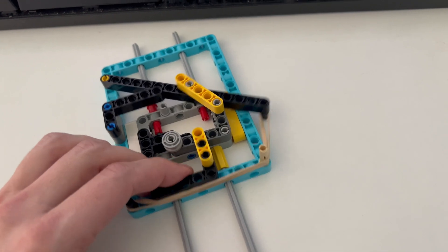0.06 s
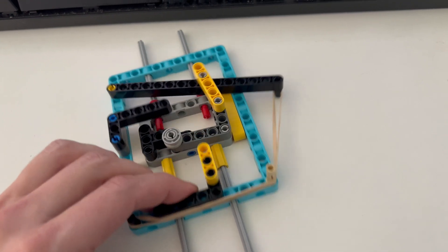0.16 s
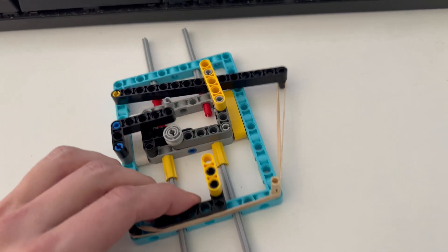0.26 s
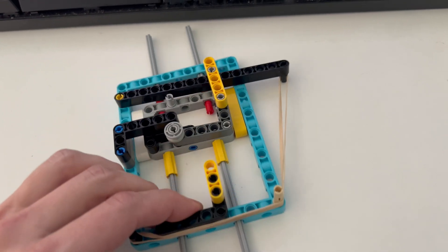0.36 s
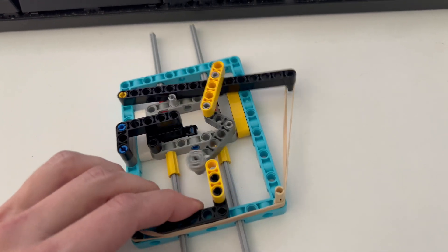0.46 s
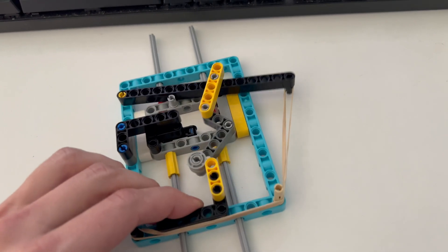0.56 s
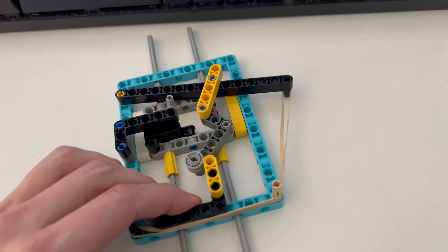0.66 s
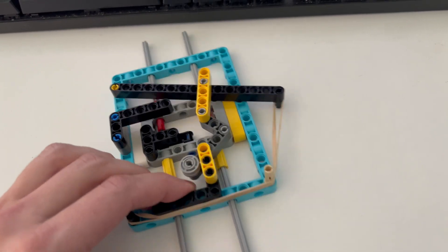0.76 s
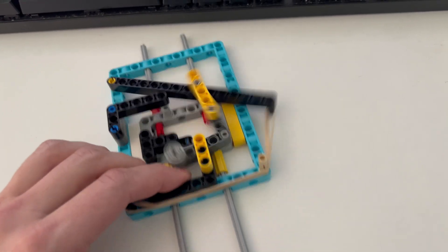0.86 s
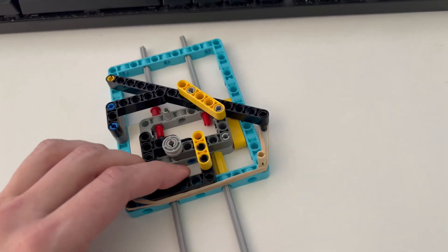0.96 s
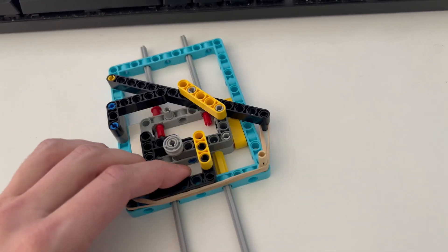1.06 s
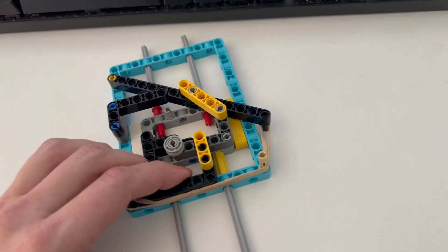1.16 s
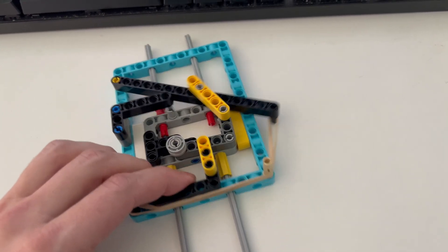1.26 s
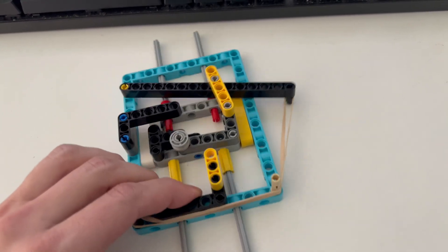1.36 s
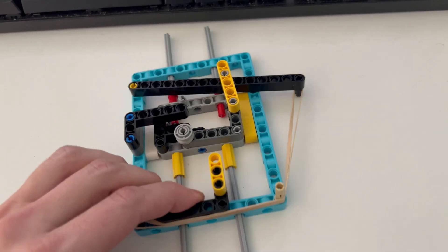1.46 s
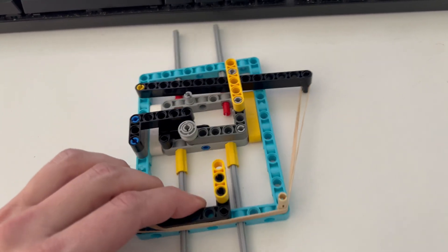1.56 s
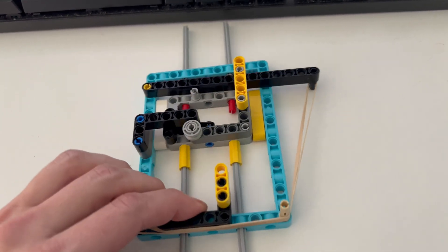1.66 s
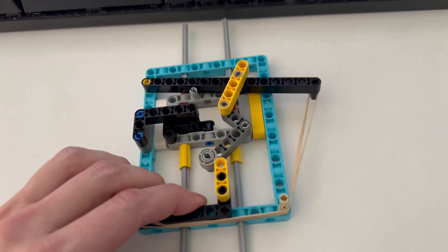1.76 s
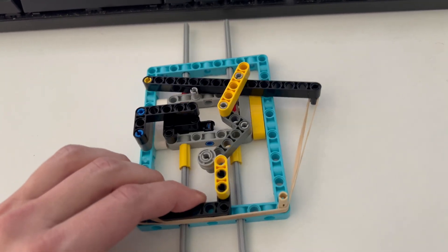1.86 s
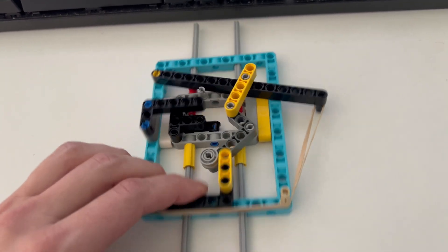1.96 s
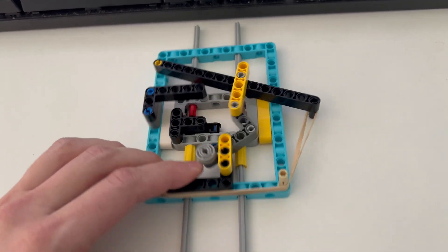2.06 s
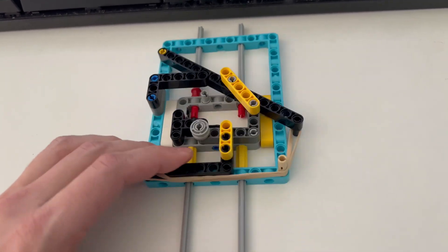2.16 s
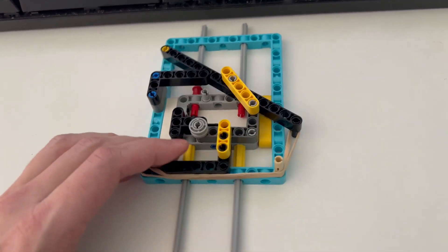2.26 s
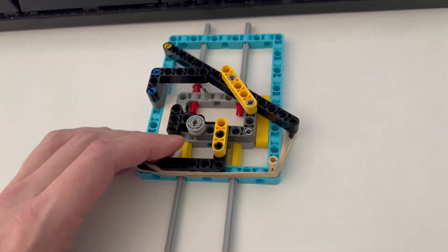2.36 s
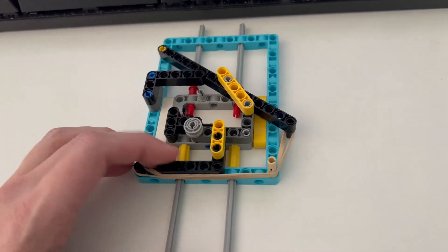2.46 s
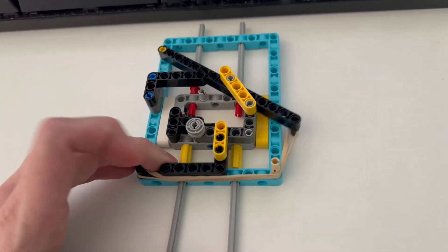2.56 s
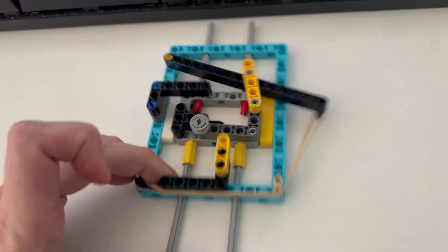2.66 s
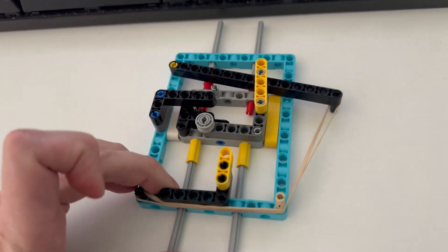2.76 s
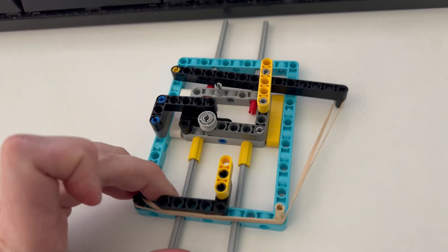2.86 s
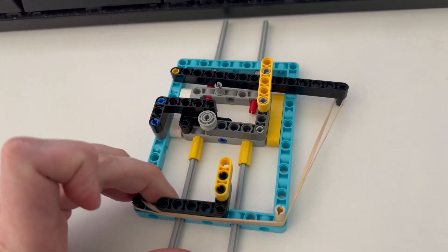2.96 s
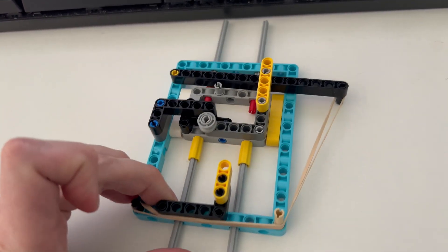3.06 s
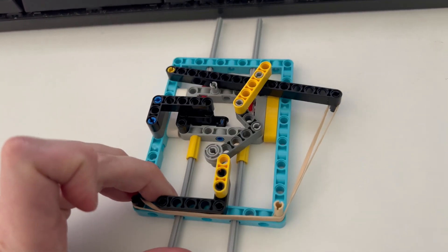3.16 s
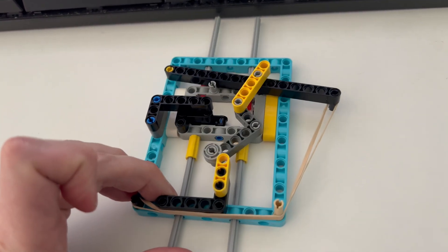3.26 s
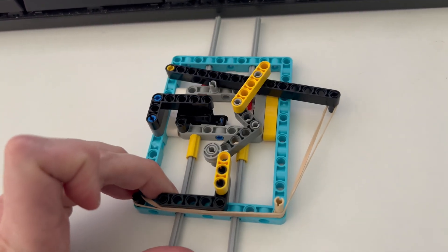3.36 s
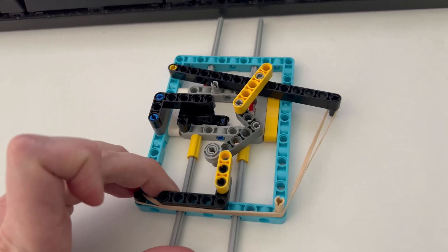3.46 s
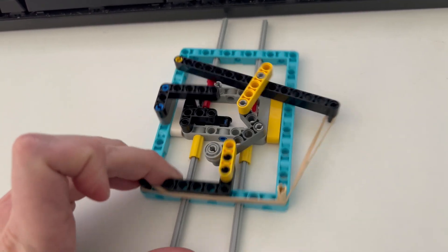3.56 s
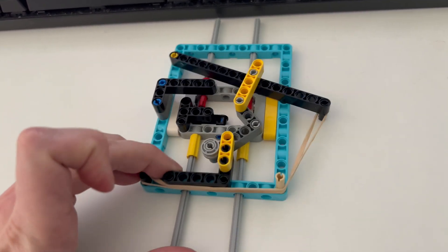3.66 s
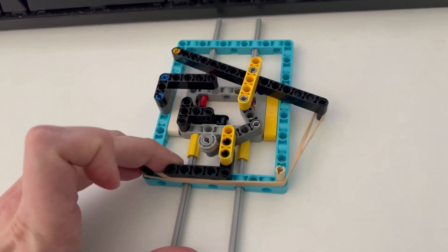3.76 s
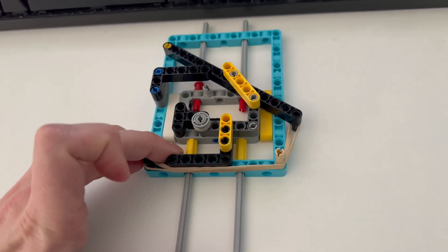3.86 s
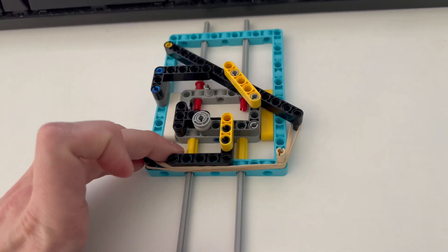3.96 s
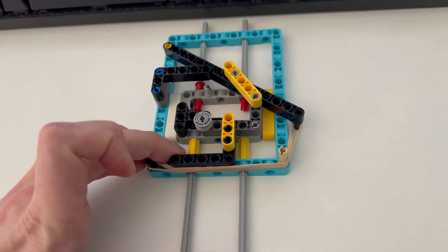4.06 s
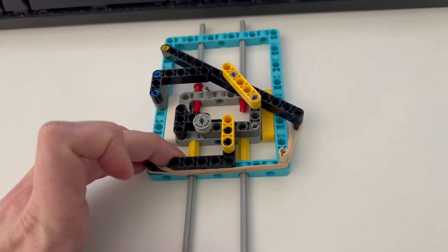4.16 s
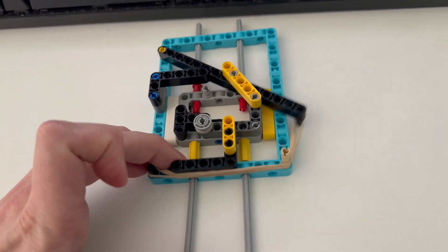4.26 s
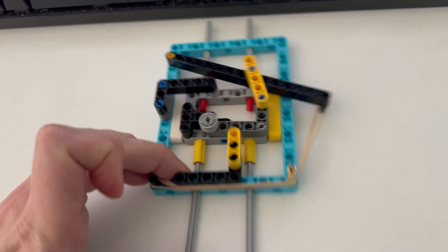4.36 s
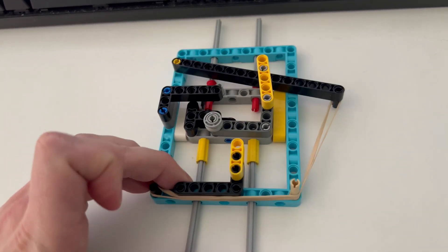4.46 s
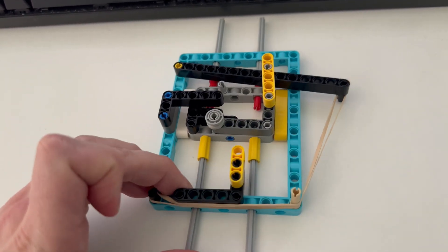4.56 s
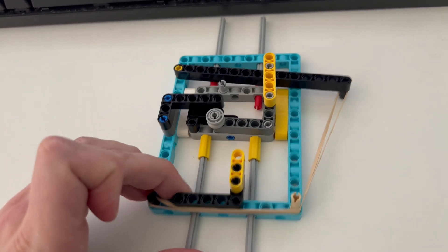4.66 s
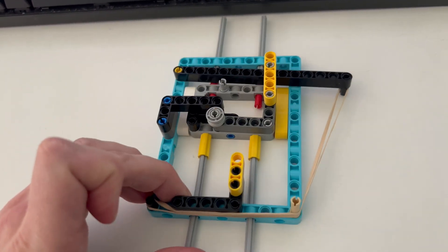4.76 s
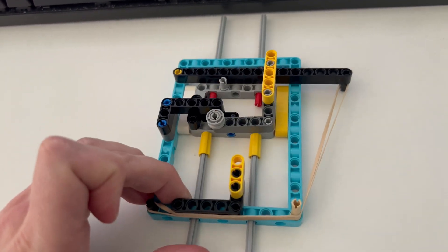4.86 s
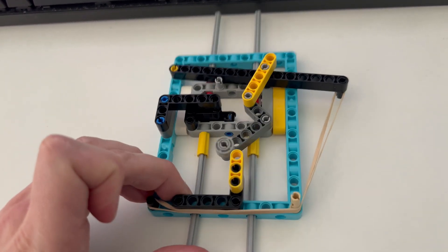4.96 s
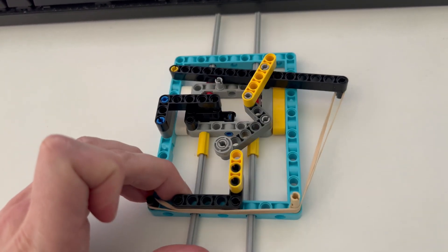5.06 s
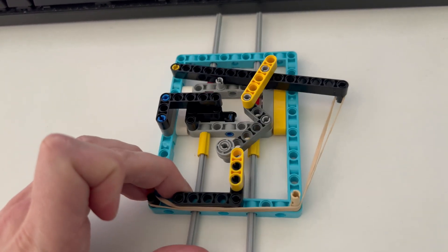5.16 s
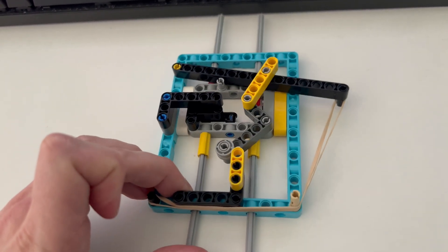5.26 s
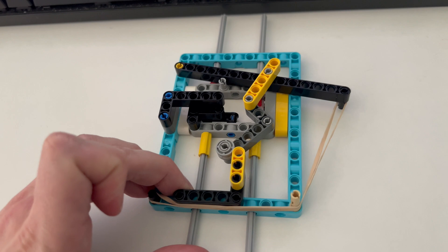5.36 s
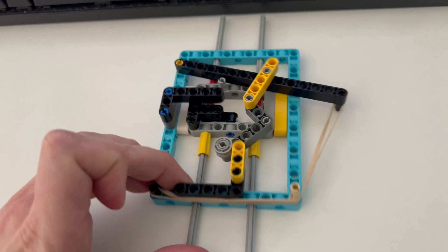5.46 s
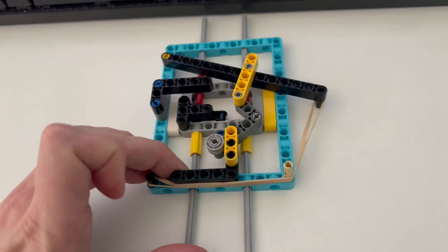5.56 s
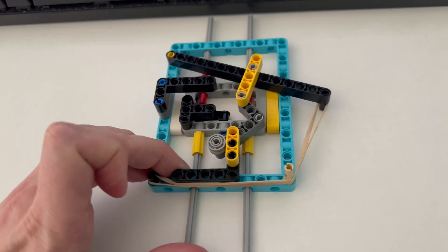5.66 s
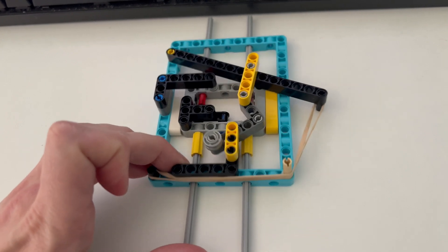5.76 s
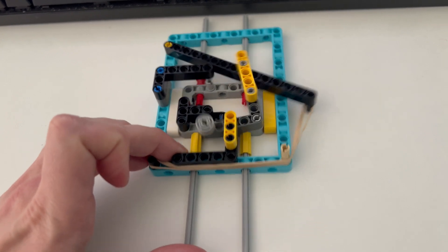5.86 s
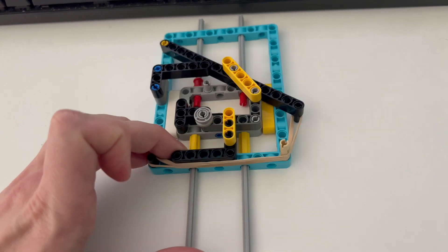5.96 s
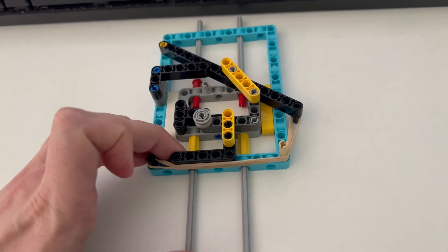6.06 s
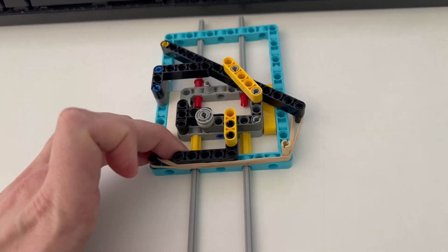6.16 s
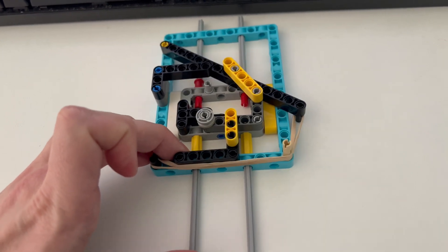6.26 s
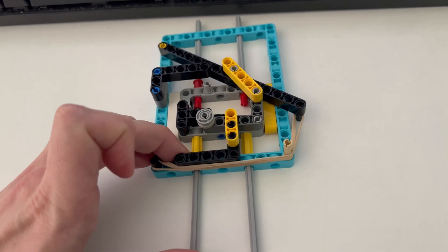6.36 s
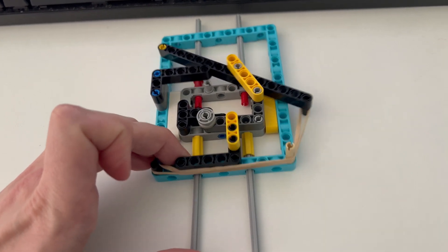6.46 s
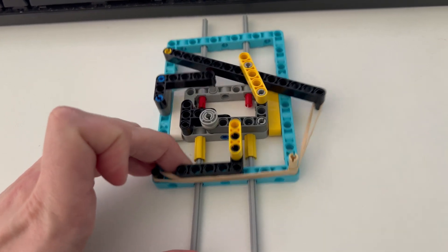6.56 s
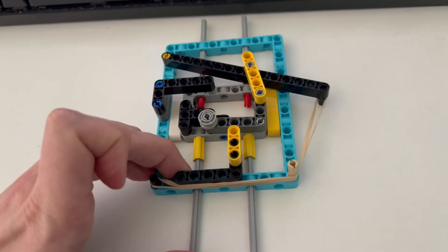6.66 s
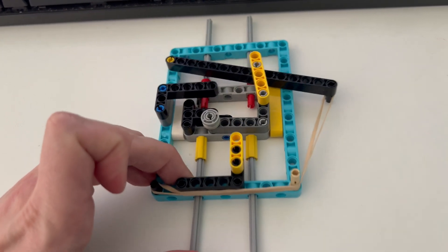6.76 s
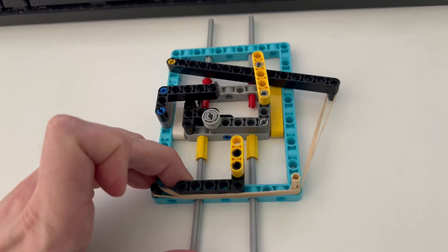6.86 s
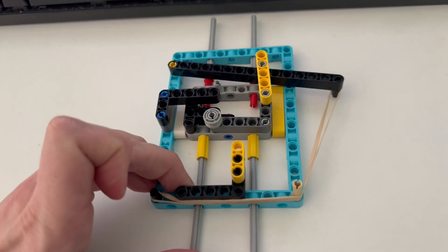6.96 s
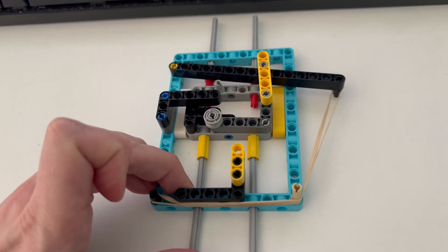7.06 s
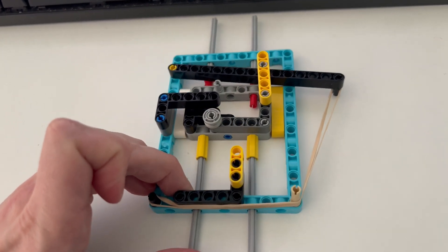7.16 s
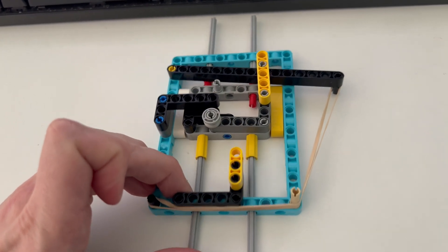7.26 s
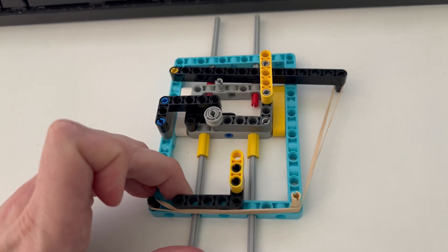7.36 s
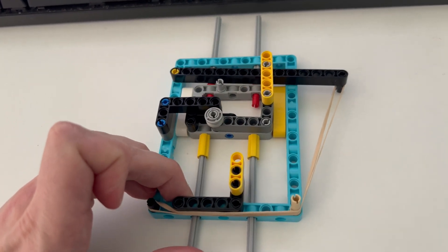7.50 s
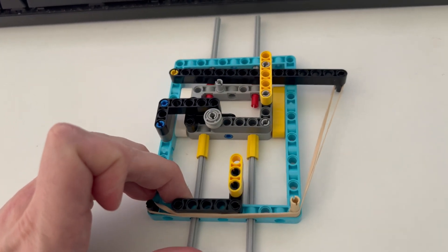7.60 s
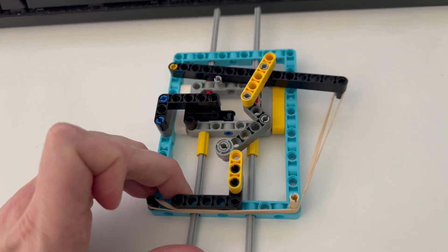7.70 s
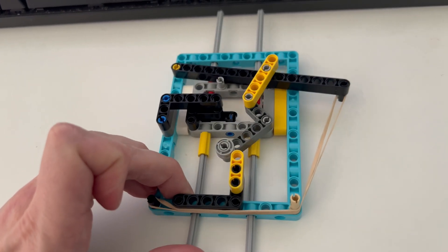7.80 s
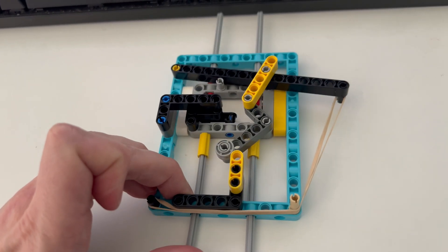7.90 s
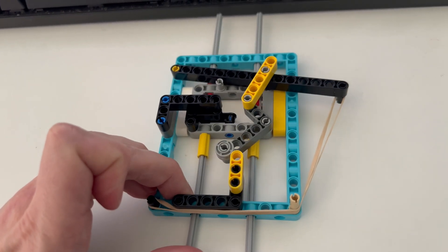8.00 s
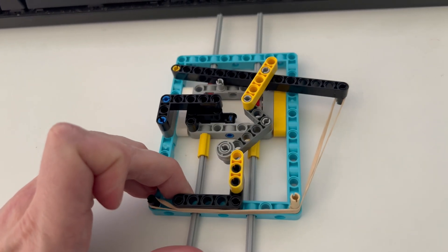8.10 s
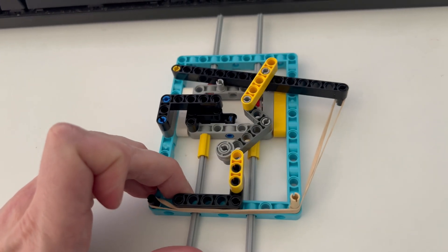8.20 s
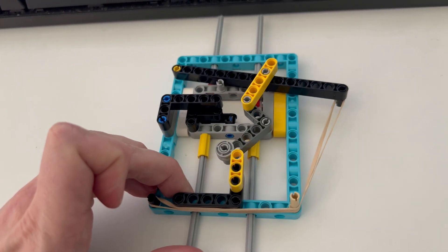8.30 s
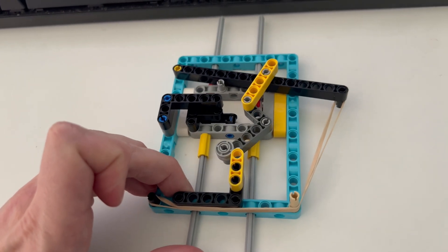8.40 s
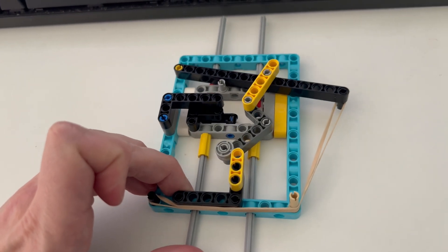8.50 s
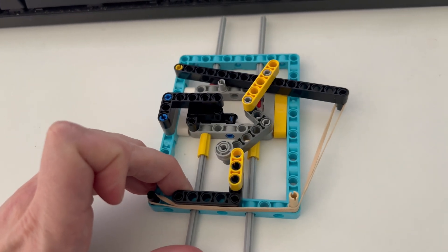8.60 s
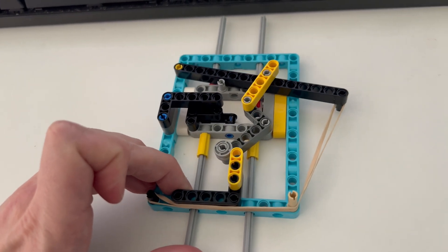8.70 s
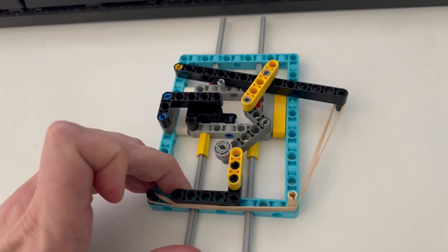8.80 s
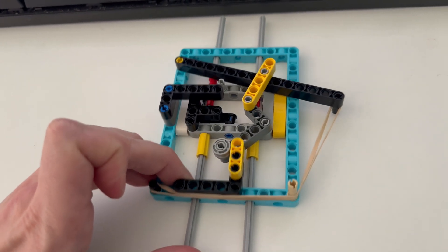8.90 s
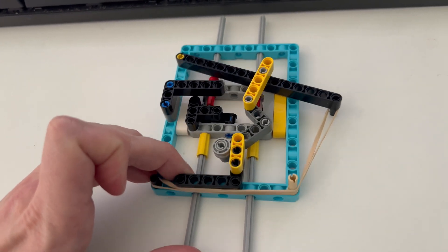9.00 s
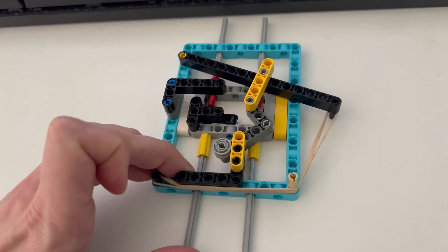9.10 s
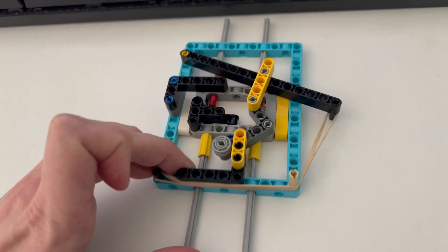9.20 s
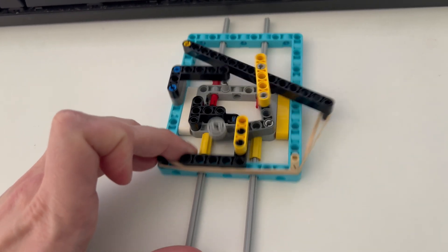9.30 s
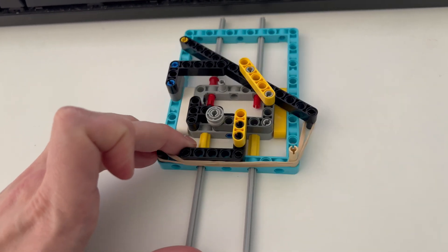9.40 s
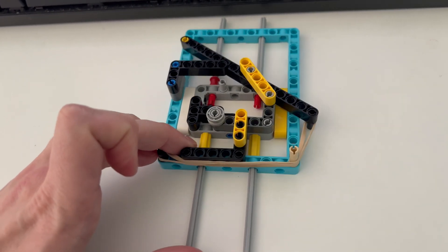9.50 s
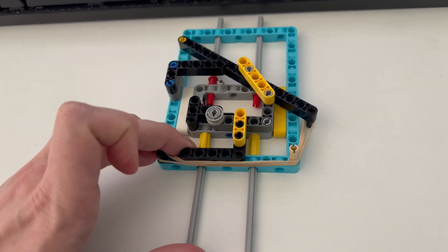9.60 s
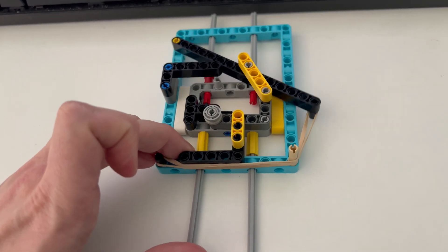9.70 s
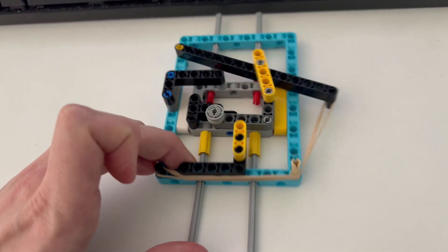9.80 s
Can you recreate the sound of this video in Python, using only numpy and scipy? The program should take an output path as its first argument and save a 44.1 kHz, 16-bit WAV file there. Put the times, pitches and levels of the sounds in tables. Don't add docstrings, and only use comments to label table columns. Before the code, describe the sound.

Close, dry and crisp: plastic parts rub along rods with gritty, faintly humming friction, speeding up before band-driven levers crack against their stops. Ten sharp snaps fall irregularly over ten seconds, most with a short loose rattle and a dull knock through the desk. Faint ticks, taps and grazes fill the gaps. Quiet low air noise lies beneath, with short small-room reflections.

```python
import sys
import numpy as np
from scipy import signal
from scipy.fft import rfft, irfft, next_fast_len
from scipy.io import wavfile
from scipy.ndimage import uniform_filter1d

SR = 44100
rng = np.random.default_rng(int(sys.argv[2]) if len(sys.argv) > 2 else 0)


def unload_audio(sound):
    columns = np.transpose(np.atleast_2d(sound))
    steps = np.round(np.clip(columns, -1, 1) * 32767)
    wavfile.write(sys.argv[1], SR, steps.astype(np.int16))


def invert_db(level):
    return 10 ** (np.asarray(level, dtype=float) / 20)


N = 433944
SIZE, LEAD = 4096, 512

# (frequency [Hz], level [dB per Hz])
AIR = [(25, -29.5), (36, -12.5), (52, -1.5), (108, -2.5), (160, -13), (250, -11.5), (330, -17.5),
       (600, -37), (1000, -35), (1650, -38), (3000, -50.5), (8000, -56), (16000, -50.5)]
# (time [s], level [dB])
DRAUGHT = [
    (0.0, -58),
    (0.52, -56),
    (1.23, -59),
    (2.05, -53.5),
    (2.38, -57.5),
    (4.27, -57.5),
    (4.96, -56),
    (6.93, -59),
    (8.06, -57),
    (9.84, -58),
]
# (frequency [Hz], decay time t60 [s])
ROOM = [(150, 1), (500, 0.97), (1500, 0.58), (4000, 0.43), (6500, 0.3), (10000, 0.1), (15000, 0.1)]
# (frequency [Hz], left minus right [dB])
PORT_BALANCE = [(60, 0), (400, 0), (700, -5), (1300, -1), (4400, -1), (8000, 0), (16000, 0)]
# (frequency [Hz], difference over sum [dB])
WIDTH = [(25, -24), (60, -21), (125, -12), (500, -1), (1200, 2), (1900, -3), (3300, 1), (4300, -2),
         (5000, 3), (6000, -7), (9500, -3), (12000, 7), (12900, 27), (14600, 27), (15600, 12)]

# (frequency [Hz], level [dB], decay time t60 [s])
BEAMS = [(1283, 0.5, 0.016), (1600, -8.5, 0.063), (2070, -8.5, 0.011), (2150, -15, 0.008), (2750, 0, 0.046),
         (3300, 4.5, 0.013), (3973, 1.5, 0.018), (4730, -10.5, 0.015), (6470, -1.5, 0.027),
         (7070, 7, 0.005), (8150, -7, 0.046), (12000, -27, .015)]
# (frequency [Hz], level [dB], decay time t60 [s])
FRAME = [(406, -9.5, 0.033), (440.5, 1, 0.062), (490, -12.5, 0.047), (713.4, 0, 0.069),
         (826.3, -0.5, 0.073), (910, -6.5, 0.033)]
# (frequency [Hz], level [dB], decay time t60 [s])
DESK = [(75, 1.5, 0.14), (111, -7, 0.2), (192, -14.5, 0.13), (285, 1.5, 0.071)]
# (frequency [Hz], level [dB], decay time t60 [s])
STRUCK = [
    [(1670, -5.5, 0.026), (3680, -3, 0.042), (4270, -1, 0.03), (8100, -7, 0.029)],
    [(2740, -4.5, 0.039), (4447, -25, 0.52), (5930, -3, 0.028), (7860, -1.5, 0.03)],
    [(1730, -20, 0.13), (4597, -8, 0.013), (6248, -9.5, 0.014), (7600, -13, 0.057)],
    [(2605, -7.5, 0.034), (3420, -17, 0.043), (4960, 1.5, 0.018), (7870, 0, 0.017)],
    [(2650, -10, 0.048), (4900, -9, 0.026), (6390, -10.5, 0.031), (7860, -2.5, 0.012)],
    [(1620, -16.5, 0.2), (2720, -19, 0.056), (3530, 1.5, 0.013), (7881, -23, 0.078)],
    [(1345, -7.5, 0.087), (1590, -14, 0.12), (4900, 0, 0.044), (5900, -4.5, 0.043)],
    [(2840, -2, 0.1), (4600, 1, 0.03), (6830, -1, 0.078), (7000, -7, 0.05)],
    [(2000, -2.5, 0.024), (2750, 2, 0.066), (3956, -2.5, 0.02), (8800, -20, 0.056)],
    [(1640, -19.5, 0.083), (2666, 0, 0.046), (4450, -10, 0.051), (5940, -1, 0.022)],
]
# (frequency [Hz], level [dB], decay time t60 [s])
ROCKED = [
    [(366, -2, 0.14), (816, 0, 0.068)],
    [(440, -4, 0.07), (705.6, -1.5, 0.092)],
    [(473, -2, 0.065), (704, -4.5, 0.31)],
    [(402, -6, 0.15), (694, 0, 0.14)],
    [(807, -6, 0.083), (993, -7, 4.2)],
    [(424, -7.5, 0.18), (712, -0.5, 0.13)],
    [(449, -4.5, 0.092), (840, -1.5, 0.034)],
    [(430, -17, 0.27), (695, 0.5, 0.12)],
    [(302, -2, .12), (689, -6.5, 0.06), (870, 1, 0.1), (1070, -2.5, 0.045)],
    [(432, -12, 0.1), (699, 0.5, 0.064)],
]
# (frequency [Hz], level [dB])
CRACK = [(700, -27), (1500, -4), (2500, -7), (4500, -1), (6000, -6.5), (8000, -3.5), (10500, -7),
         (13000, 1.5), (15600, -17.5), (16800, -44)]
# (frequency [Hz], level [dB per Hz])
SCRAPE = [(600, -40), (1000, 6.5), (1600, 6), (3000, 3.5), (4500, -11), (6500, -6), (10000, -15),
          (13500, -1.5), (16000, -20.5), (16900, -61.5)]

# (start [s], end [s], scrape at start [dB], scrape at end [dB], frame hum re scrape [dB])
STROKES = [(0.078, 0.45, -54.5, -66, 3.5), (0.555, 0.86, -61.5, -57, 1.5), (1.275, 1.664, -54.5, -69.5, 0),
           (1.797, 1.89, -52, -58.5, 3), (2.031, 2.06, -46.5, -61, 1.5), (2.435, 2.49, -58.5, -65.5, 4),
           (2.82, 2.84, -63.5, -56.5, -3), (3.586, 3.73, -61.5, -65.5, 2.5),
           (4.306, 4.37, -60.5, -49.5, -4), (4.524, 4.7, -63.5, -67.5, 6), (4.807, 5.1, -65, -82, 7.5),
           (5.451, 5.52, -61.5, -53.5, -3), (6.179, 6.51, -71.5, -74.5, 6.5), (6.394, 6.6, -68, -63, 1),
           (6.617, 6.842, -61.5, -64, -9), (6.923, 6.94, -55, -61, -9), (7.295, 7.14, -65.5, -64, -4.5),
           (7.47, 7.52, -69.5, -70.5, -21), (8.882, 9.19, -56.5, -72.5, 1), (9.744, 9.8, -63.5, -53.5, 0)]
# (start [s], end [s], scrape at end [dB], frame hum re scrape [dB])
PULLS = [
    (2.061, 2.116, -41, 1.5),
    (2.557, 2.693, -49, 4.5),
    (3.006, 3.08, -53.5, 6),
    (3.496, 3.581, -51, -2),
    (3.712, 3.855, -45.5, -4.5),
    (5.742, 5.886, -52.5, 2.5),
    (7.605, 7.64, -56, -11.5),
    (9.147, 9.325, -51, -1.5),
]
# (time [s], centre frequency [Hz])
RUB = [(0.0, 1148), (0.13, 2293), (3.26, 2220), (3.78, 1490), (3.81, 3982), (4.08, 1780), (4.85, 2707),
       (5.81, 1320), (5.86, 4410), (6.3, 1445), (6.63, 4015), (6.77, 1072), (7.18, 2690), (9.12, 1387),
       (9.34, 2975), (9.84, 1553)]

# (time [s], peak level [dB])
THUDS = [
    (0.458, -40.5),
    (0.898, -48.5),
    (1.72, -38),
    (2.151, -38.5),
    (3.13, -36),
    (3.859, -42),
    (4.945, -38),
    (5.922, -49),
    (7.691, -30.5),
    (9.352, -44.5),
]
# (time [s], peak level [dB], frame knock re peak [dB],
# struck beam [Hz], top above 6.5 kHz re below [dB])
SNAPS = [
    (0.445, -4, -26.5, 3843, 7),
    (0.895, -9, -17.5, 2800, 0),
    (1.705, -6.5, -23, 6880, 3.5),
    (2.1381, -8, -12, 2548, 0.5),
    (3.1209, -6, -26.5, 8384, 8),
    (3.848, -9, -12, 4020, 1.5),
    (4.9333, -4.5, -24, 4390, 7.5),
    (5.9025, -11, -14, 4900, 2),
    (7.6693, -5.5, -22, 3890, 5.5),
    (9.3468, -12.5, -14.5, 2790, 6.5),
]
# (time [s], peak level [dB], frame knock re peak [dB],
# ring [Hz], top re below [dB])
REBOUNDS = [
    (0.45, -22.5, -16, 1562, -17.5),
    (0.898, -12, -20, 3850, -7),
    (3.1249, -21, -11.5, 3096, -14.5),
    (3.851, -11, -21.5, 4194, -9),
    (4.9383, -21, -11.5, 1600, -7),
    (7.6711, -16.5, -9.5, 2000, -11.5),
    (9.349, -16, -19.5, 6036, -4),
]
# (time [s], peak level [dB], frame knock re peak [dB],
# ring [Hz], top re below [dB])
BOUNCES = [(0.437, -25, -13, 4400, -12.5), (0.458, -36, -10.5, 2720, -0.5),
           (0.4744, -21.5, -12, 1260, -7.5), (0.483, -21, -11, 3980, -1), (0.5107, -28, -15, 4000, -11.5),
           (1.696, -21, -18.5, 4730, -5), (1.7253, -25, -15, 3070, -1.5), (1.7443, -25, -19.5, 2720, -7.5),
           (1.755, -21.5, -11.5, 1330, -14.5), (1.7949, -35, -5.5, 2650, -9.5),
           (3.1118, -23, -17, 3600, 8.5), (3.1299, -26, -14, 3800, -3.5), (3.1553, -26, -16.5, 2820, -5),
           (3.1695, -20.5, -12.5, 2900, -17.5), (3.8532, -24, -1.5, 1390, -11.5),
           (4.9244, -26.5, -16.5, 3250, -5), (4.9812, -24, -9, 1900, -13), (5.0312, -31.5, -8, 2650, -20),
           (5.8935, -39.5, -39, 4520, -21), (7.6425, -30, -23, 2740, -3.5), (7.659, -27, -14, 5450, 7.5),
           (7.6754, -19.5, -13, 2870, -11), (7.6864, -22, -7.5, 7860, 7), (7.6966, -28.5, -11.5, 3670, 0)]
# (time [s], peak level [dB], ring [Hz], top re below [dB])
PINS = [(0.1344, -28.5, 5770, 5.5), (0.3695, -40, 2920, 12.5), (0.3785, -27.5, 2860, -4),
        (0.5801, -32, 3900, 3), (0.7685, -24, 7130, -3), (1.5951, -37.5, 2760, -11),
        (1.625, -26.5, 2430, 3), (1.837, -31, 2720, 4.5), (2.5806, -35, 3480, -12), (3.054, -30, 2830, 2),
        (3.0975, -33, 2780, -21), (4.2785, -32.5, 3300, -3), (4.6064, -44, 3140, -15),
        (4.657, -45.5, 2930, -18), (4.6812, -37.5, 2750, -2.5), (1.6475, -37, 2130, -21),
        (4.7909, -28.5, 2869, -3.5), (4.9182, -37, 2760, -7), (6.5982, -25.5, 4240, 8),
        (7.0613, -42, 2750, -6.5), (1.6405, -37, 3930, -22), (7.166, -38, 2750, -7),
        (7.2826, -36, 6400, -3.5), (7.3226, -37.5, 6346, -5), (7.6064, -34.5, 2881, -0.5),
        (8.4714, -52.5, 2640, 4.5), (9.339, -36, 2486, 3)]
# (time [s], peak level [dB], ring [Hz], top re below [dB])
CATCHES = [(0.0963, -40, 1700, -14), (0.3391, -39.5, 2720, -24), (0.3972, -37.5, 2970, -20),
           (0.716, -37, 2350, -1.5), (1.231, -41, 2240, -17.5), (1.2683, -45.5, 3660, -1),
           (1.4827, -42, 3070, -17.5), (1.5223, -42, 3000, -21), (1.5476, -40, 2900, -16.5),
           (1.953, -39, 2340, -8.5), (3.7634, -42, 1250, -18), (4.502, -48.5, 2900, -27),
           (4.8543, -44, 2740, -24), (5.161, -43.5, 3560, -13), (6.407, -50, 3300, -33),
           (6.4659, -39, 3710, -7), (6.918, -44, 1483, -8.5), (7.4641, -55, 2750, -14),
           (8.1106, -50.5, 3353, -24.5), (8.946, -47, 1425, 12), (8.983, -43.5, 1620, -6.5),
           (9.043, -49, 2610, -0.5), (9.6578, -45.5, 3540, -26)]
# (time [s], peak level [dB], ring [Hz], top re below [dB])
TAPS = [(0.0669, -42, 2460, -28), (0.2665, -45.5, 2640, -7.5), (0.6527, -40.5, 3650, -22),
        (0.679, -41, 3800, 3), (0.7305, -38.5, 1600, -7), (1.9214, -39.5, 3830, -3),
        (2.0182, -33.5, 3870, 0.5), (2.431, -49, 3300, -10), (2.687, -45.5, 1670, -16),
        (2.878, -44.5, 2780, -23.5), (3.0, -35.5, 2990, 0.5), (4.2612, -55.5, 1600, -13.5),
        (5.452, -39.5, 3960, 2), (5.5671, -39.5, 2640, 6), (5.6823, -44.5, 2550, -3),
        (5.6975, -43.5, 1650, -35), (7.4748, -47, 3090, -14), (8.523, -43.5, 2670, 11),
        (8.6554, -40, 3440, 4.5), (9.024, -47.5, 2600, -13), (9.1714, -43.5, 2390, -5.5),
        (9.19, -49, 1620, -18.5), (9.796, -48.5, 1500, -17)]
# (time [s], peak level [dB], ring [Hz], top re below [dB])
BUMPS = [(0.8747, -34.5, 2350, -8), (2.0931, -41, 1710, -32), (2.8515, -51, 2876, -8),
         (3.4192, -55, 2740, -36.5), (3.5041, -43.5, 3600, -8), (3.6352, -44, 3730, 0),
         (4.547, -42.5, 1500, -34), (5.2905, -56.5, 1260, -41), (5.425, -41, 2237, 3.5),
         (6.753, -47.5, 1520, -27), (8.385, -57, 1442, -38.5), (8.6066, -53.5, 2030, -34.5),
         (8.85, -44, 2690, -1), (9.075, -54, 2600, 10), (9.308, -48.5, 2400, -18), (9.7451, -52, 2110, -2)]
# (time [s], peak level [dB], ring [Hz], top re below [dB])
GRAZES = [(0.0422, -51, 1660.0, -20), (0.1412, -47.5, 3230, -2.0), (0.2412, -49.5, 2800.0, -30.5),
          (0.2742, -49, 2370.0, 0.5), (0.2952, -50.5, 2840.0, -1.5), (0.4242, -46.5, 2930.0, -15.5),
          (0.7632, -42, 2950.0, -2), (0.8562, -55.0, 1212, -1), (0.8862, -33, 4490, -5.5),
          (1.1302, -56, 1617, -21.0), (1.1982, -50.5, 1855, -20), (1.3572, -51.5, 1420.0, -21),
          (1.4942, -48, 2330.0, -6.0), (1.6182, -46.0, 1930, -4.5), (1.6812, -48.0, 2366, -25.5),
          (1.9452, -51, 2370.0, -14.0), (2.5642, -55, 2320, -13.0), (4.149, -54, 2400.0, -19),
          (2.7872, -55, 2780.0, -23.0), (2.8222, -50.5, 2000.0, -3), (3.2212, -31, 2670, -16),
          (3.2942, -44.5, 3530.0, -4), (3.5322, -45.5, 2680, -4), (3.6722, -56.5, 2115, -4),
          (3.8262, -40, 1536, -11), (4.3832, -41.5, 3250, -12.0), (4.5372, -47, 2820.0, -1),
          (4.7852, -44, 2560, -17), (4.8462, -45.0, 3040.0, -9), (4.8672, -59, 2890.0, -18.5),
          (4.9572, -33.5, 7390, 4), (5.4612, -49, 2740, 4), (6.3982, -48.5, 3350, -19),
          (6.4182, -60.5, 3570.0, -27), (6.5732, -50, 2000.0, 3), (6.9622, -51.5, 1260, -27),
          (7.1552, -54, 2050, -19.5), (7.2702, -50.5, 2670.0, -24), (7.6122, -56, 2780.0, -16.5),
          (7.6232, -46, 2690, -6), (7.6292, -42, 2890.0, -9.5), (8.9622, -51, 1550.0, -17),
          (8.9942, -50, 1580, -7), (9.1152, -51, 2600, -26), (9.6512, -55, 1590.0, -9.5),
          (9.6802, -51.5, 3420, -23)]

PIN_KNOCK_DB, CATCH_KNOCK_DB, TAP_KNOCK_DB, BUMP_KNOCK_DB, GRAZE_KNOCK_DB = -22.5, -11, -8, -2, -10
STRUCK_DB, STRUCK_T60_S, ROCKED_DB, ROCKED_T60_S = 6.5, 0.082, 7.5, 0.09
FLEX = 0.02
NEAR_S = 0.12
CREEP_DB, REST_DB, REST_HUM_DB = -72, -76.5, 0.5
START_DB_PER_S, STOP_DB_PER_S = 298, 260
HISS_DB, HISS_FROM_DB, HISS_PER_DB = -11, -64.5, 0.31
RUB_DB_PER_OCTAVE = 2.5


def read(table, hz):
    f, v = np.transpose(table)
    return np.interp(np.log(hz + 1), np.log(f + 1), v)


def unit(x):
    return x / np.sqrt(np.mean(x ** 2))


def peak(x):
    return x / np.max(np.abs(x))


def colour(x, gain):
    n = next_fast_len(x.shape[-1])
    spectrum = rfft(x, n) * gain(np.fft.rfftfreq(n, 1 / SR))
    return irfft(spectrum, n)[..., :x.shape[-1]]


def ring(modes, hz, scatter_db=0, damp=1, shift=1):
    f, db, t60 = np.transpose(modes)[:, :, None]
    pole = np.exp(2j * np.pi * f * shift / SR - np.log(1000) / (damp * t60 * SR))
    z = np.exp(-2j * np.pi * hz / SR)
    resonance = pole.imag * z / ((1 - pole * z) * (1 - pole.conj() * z))
    return np.sum(invert_db(db + scatter_db) * resonance, axis=0)


def walk(rate):
    k = int(SR / rate)
    return uniform_filter1d(np.repeat(rng.standard_normal(N // k + 1), k), k)[:N]


def add(out, s, x):
    i = max(int(s * SR), 0)
    out[..., i:i + x.shape[-1]] += x[..., :N - i]


def air():
    noise = colour(rng.standard_normal((2, N)), lambda hz: invert_db(read(AIR, hz)))
    swell_db = np.interp(np.arange(N) / SR, *np.transpose(DRAUGHT))
    return invert_db(swell_db + 1.0 * walk(2.5) + 2.2 * walk(11)) * unit(noise)


def room(dry):
    t, tail = np.arange(SR) / SR, 0
    for hz, t60 in ROOM:
        noise = rng.standard_normal((2, SR))
        band = colour(noise, lambda f: np.exp(-(np.log((f + 1) / hz) / 0.65) ** 2))
        tail = tail + band * invert_db(-50 * t / t60 - 60 * t ** 2 / t60)
    tail = tail * (1 - np.exp(-t / 0.00084))
    tail = tail / np.sqrt(np.sum(tail ** 2) / 2)
    return signal.fftconvolve(dry[:1], tail, axes=1)[:, :N]


def thuds():
    out, t, hz = np.zeros((2, N)), np.arange(4 * SIZE) / SR, np.fft.rfftfreq(4 * SIZE, 1 / SR)
    for s, db in THUDS:
        push = t * np.exp(-t / 0.016) * rng.standard_normal(len(t))
        boom = irfft(rfft(push) * ring(DESK, hz))
        add(out, s - 0.01, invert_db(db) * peak(boom))
    return out


def hand():
    t = np.arange(N) / SR
    db, hum_db = np.full(N, 1. * REST_DB), np.full(N, 1. * REST_HUM_DB)
    pulls = [(start, end, CREEP_DB, to_db, own_db) for start, end, to_db, own_db in PULLS]
    for start, end, from_db, to_db, own_db in STROKES + pulls:
        move = np.interp(t, [start, end], [from_db, to_db])
        move = move - START_DB_PER_S * np.maximum(start - t, 0) - STOP_DB_PER_S * np.maximum(t - end, 0)
        hum_db = np.where(move > db, own_db, hum_db)
        db = np.maximum(move, db)
    hiss_db = HISS_DB + HISS_PER_DB * np.maximum(db - HISS_FROM_DB, 0)
    return db, uniform_filter1d(hum_db, size=SR // 50), hiss_db


def friction_grit():
    grains = np.repeat(rng.exponential(size=N // 48 + 1), 48)[:N]
    return rng.standard_normal((2, N)) * invert_db(2.2 * walk(40) + 1.5 * walk(200) + 2.9 * grains)


def rubbing_beams(grit):
    lean = invert_db(5.5 * np.array([walk(7.1), walk(9), walk(8.2)]))
    lean = lean / np.sqrt(np.sum(lean ** 2, axis=0))
    rub = 0
    for k, shift in enumerate([0.93, 1, 1.08]):
        def body(hz):
            return invert_db(read(SCRAPE, hz)) * (1 + 0.022 * np.abs(ring(BEAMS, hz, damp=1.7, shift=shift)))
        rub = rub + lean[k] * colour(np.roll(grit, 9 * k, axis=1), body)
    return rub


def slide():
    db, hum_db, hiss_db = hand()
    grit = friction_grit()
    rub = rubbing_beams(grit)
    centre = np.interp(np.arange(N) / SR, *np.transpose(RUB))

    def band(mid_hz):
        part = colour(rub, lambda hz: np.exp(-(np.log((hz + 1) / mid_hz) / 0.37) ** 2))
        return part * invert_db(2.4 * walk(16) - RUB_DB_PER_OCTAVE * np.abs(np.log2(centre / mid_hz)))

    low = band(840) + band(1500) + band(2200) + band(4100) + invert_db(-4.0) * band(4200)
    hiss = colour(rub, lambda hz: 1 - 1 / (1 + (hz / 5500) ** 6)) * invert_db(2.0 * walk(38))
    hum = colour(grit, lambda hz: ring(FRAME, hz, damp=0.7) / (1 + (260 / (hz + 1)) ** 4))
    hum = hum * invert_db(3.0 * walk(14))
    db = db + np.minimum(db + 68, 0)
    return invert_db(db) * (unit(low) + invert_db(hiss_db) * unit(hiss) + invert_db(hum_db) * unit(hum))


def contacts():
    kinds = [(PINS, PIN_KNOCK_DB), (CATCHES, CATCH_KNOCK_DB), (TAPS, TAP_KNOCK_DB),
             (BUMPS, BUMP_KNOCK_DB), (GRAZES, GRAZE_KNOCK_DB)]
    small = [(s, db, knock_db, hz, top_db) for rows, knock_db in kinds for s, db, hz, top_db in rows]
    return SNAPS + BOUNCES + small + REBOUNDS


def chattering_push(noise, t, hard, knock_db, loose):
    after = np.maximum(t, 0)
    rise = 1 - np.exp(-(after / (0.0005 + 0.0012 * loose + 0.001 * (1 - hard))) ** 2)
    main_s = 0.00082 + 0.0006 * hard + 0.00032 * hard * max(knock_db + 29.5, 0)
    decay = 0.67 * hard * np.exp(-after / 0.00083) + np.exp(-after / main_s)
    decay = decay + 0.17 * hard * np.exp(-after / 0.026)
    graze = invert_db(-24) * np.exp(-np.abs(t) / 0.0004)
    uneven = invert_db(3.0 * np.repeat(rng.standard_normal(SIZE // 32), 32))
    blow = 2.5 * hard * np.exp(-((t - 0.0005) * SR / 1.6) ** 2)
    push = rfft(noise * (rise * decay + graze) * uneven + blow * np.array([[1], [0], [0]]))
    return push[0] + 0.94 * push[1:]


def plastic_snap(push, crack, beams, top, t, hard, sharp_db):
    ringing = invert_db(2.5 - 9.3 * hard) * peak(irfft(push * beams))
    body = rfft(peak(irfft(push * crack)) + ringing)
    below, above = peak(irfft(body * (1 - top))), peak(irfft(body * top))
    above = above * (0.04 + np.exp(-np.maximum(t, 0) / 0.0057))
    return peak(below + invert_db(sharp_db) * peak(above))


def frame_knock(noise, frame, t, hz, hard):
    no_bass = 1 / (1 + (330 / (hz + 1)) ** 6)
    landing = np.exp(-((t - 0.004 - 0.005 * hard) / 0.004) ** 2)
    swing = landing * (noise[0] + 0.5 * noise)
    return peak(irfft(rfft(swing) * no_bass * frame))


def clicks():
    out, hz = np.zeros((3, N)), np.fft.rfftfreq(SIZE, 1 / SR)
    t = (np.arange(SIZE) - LEAD) / SR
    crack = invert_db(read(CRACK, hz))
    snap_times = np.transpose(SNAPS)[0]
    for k, (s, db, knock_db, beam_hz, sharp_db) in enumerate(contacts()):
        noise, own = rng.standard_normal((3, SIZE)), rng.standard_normal((len(BEAMS), 1))
        top = 1 / (1 + (6500 * invert_db(0.5 * min(sharp_db + 22, 0)) / (hz + 1)) ** 6)
        hard = np.clip((db + 59.5) / 40, 0, 1)
        last = np.argmin(np.abs(snap_times - s))
        since = s - snap_times[last]
        loose = 0.01 < since < NEAR_S

        flex = 1 + FLEX * rng.standard_normal((len(BEAMS), 1))
        beams = ring(BEAMS, hz, 2.8 * own, shift=flex) + invert_db(10.5) * ring([(beam_hz, 0, 0.018)], hz)
        frame = ring(FRAME, hz, 2 * own[:len(FRAME)], shift=flex[:len(FRAME)] ** 1.2)
        if k < len(SNAPS):
            struck = np.minimum(STRUCK[k], [SR, SR, STRUCK_T60_S])
            beams = beams + invert_db(STRUCK_DB) * ring(struck, hz)
        if abs(since) < NEAR_S:
            rocked = np.minimum(ROCKED[last], [SR, SR, ROCKED_T60_S])
            frame = frame + invert_db(ROCKED_DB) * ring(rocked, hz, shift=flex[0])

        push = chattering_push(noise, t, hard, knock_db, loose)
        snap = plastic_snap(push, crack, beams, top, t, hard, sharp_db)
        knock = invert_db(knock_db + 0.4 * hard) * frame_knock(noise, frame, t, hz, hard)
        even = crack * (1 - top + top * invert_db(0.62 * sharp_db)) * (1 + 0.008 * np.abs(beams))
        even = np.roll(irfft(even), LEAD)
        even = even * np.sqrt(np.sum(snap[0] ** 2) / np.sum(even ** 2))
        even = even * (not 0 < since < 0.01)
        contact = np.vstack([snap, even]) + knock * np.array([[1], [1], [0.27]])
        add(out, s - LEAD / SR, invert_db(db + 3.5) * contact)
    return out


def ports(x, turn=1, widest_db=30):
    def share(hz):
        return 1 / np.sqrt(1 + invert_db(np.minimum(read(WIDTH, hz), widest_db)) ** 2)

    mid = colour(x[0], share)
    side = colour(x[1], lambda hz: turn * np.sqrt(1 - share(hz) ** 2))
    left = colour(mid + side, lambda hz: invert_db(read(PORT_BALANCE, hz) / 2))
    right = colour(mid - side, lambda hz: invert_db(-read(PORT_BALANCE, hz) / 2))
    return np.array([left, right])


def scene():
    toy, boom, rub = clicks(), thuds(), slide()
    echo = invert_db(-12.0) * room(toy[2:] + boom[:1] + rub[:1])
    close = ports(toy[:2] + boom, turn=1j, widest_db=24)
    return close + ports(rub + echo + air())


def band_limit(x):
    return signal.sosfilt(signal.butter(12, 17000, fs=SR, output="sos"), x)


def record(dry):
    cut = signal.sosfilt(signal.butter(3, 40, "high", fs=SR, output="sos"), dry)
    return band_limit(cut)


dry = scene()
out = record(dry)
unload_audio(out)
```